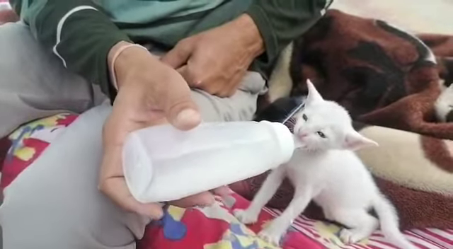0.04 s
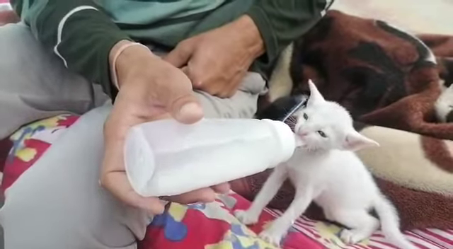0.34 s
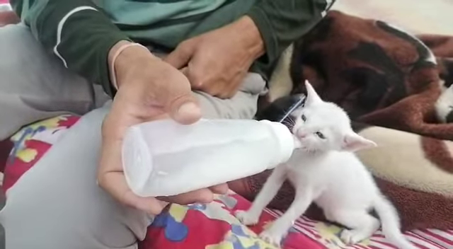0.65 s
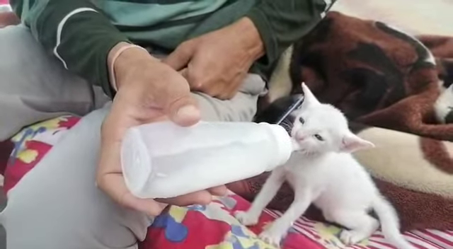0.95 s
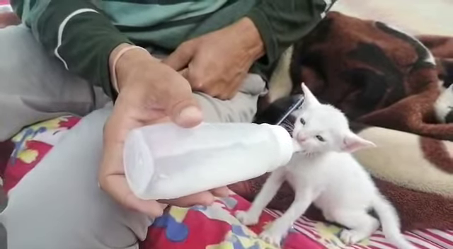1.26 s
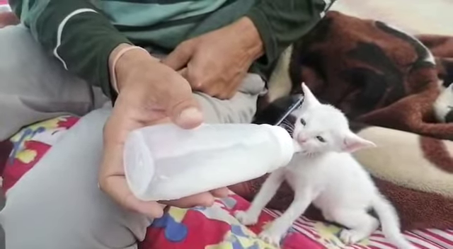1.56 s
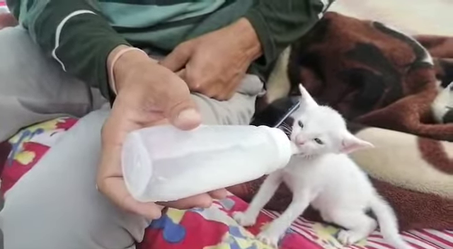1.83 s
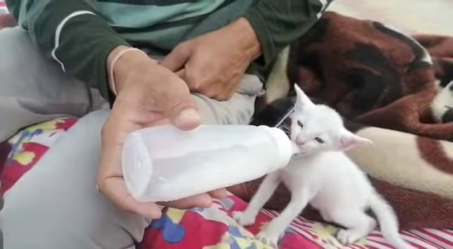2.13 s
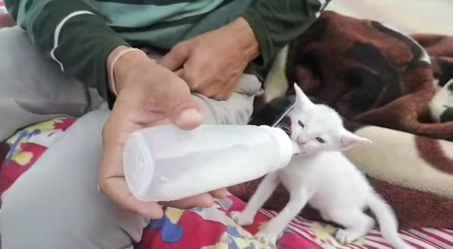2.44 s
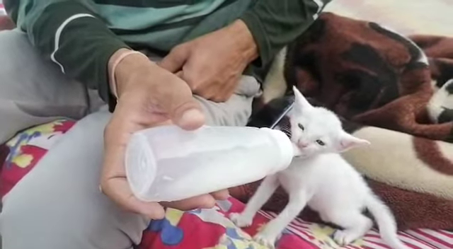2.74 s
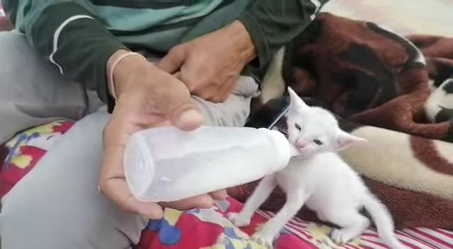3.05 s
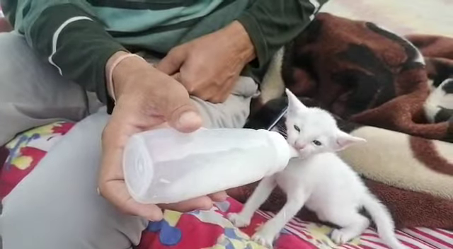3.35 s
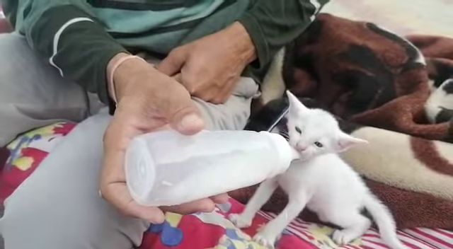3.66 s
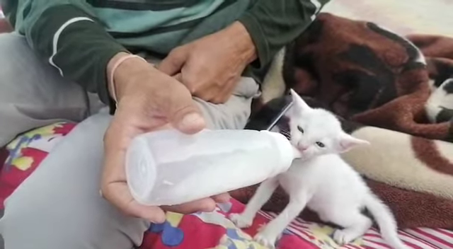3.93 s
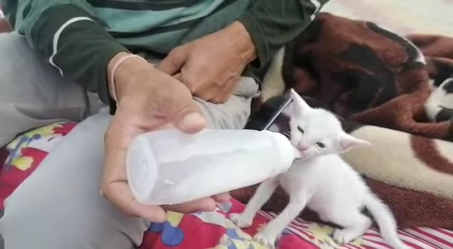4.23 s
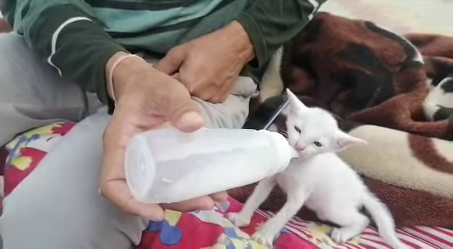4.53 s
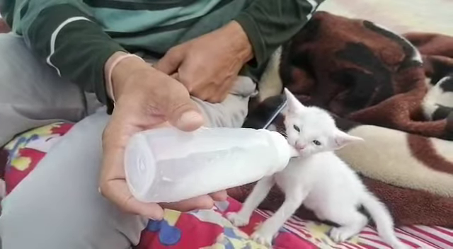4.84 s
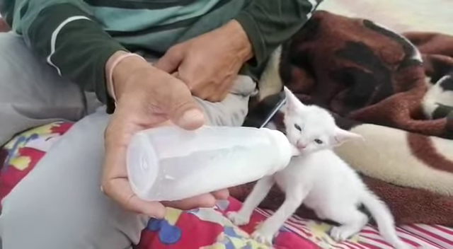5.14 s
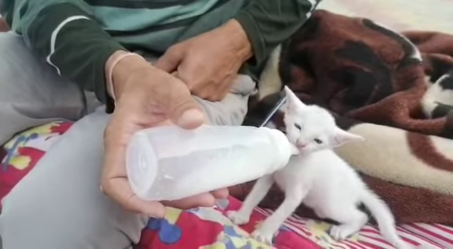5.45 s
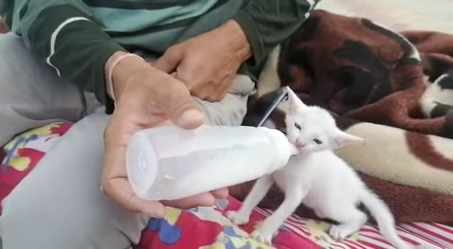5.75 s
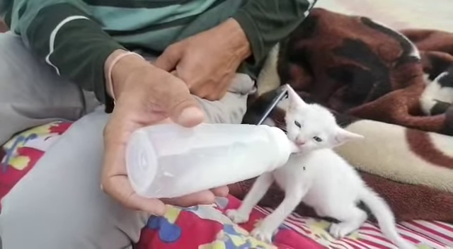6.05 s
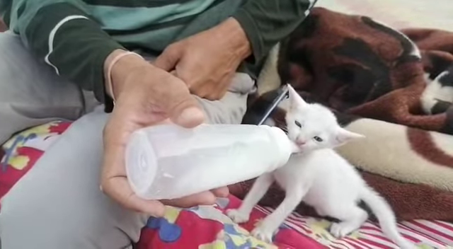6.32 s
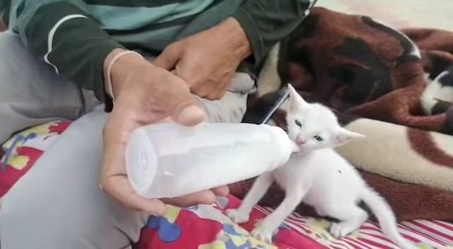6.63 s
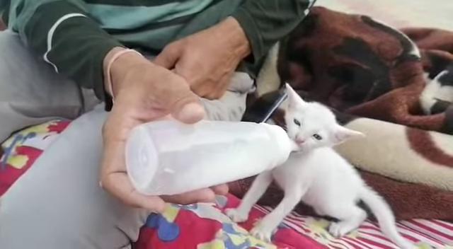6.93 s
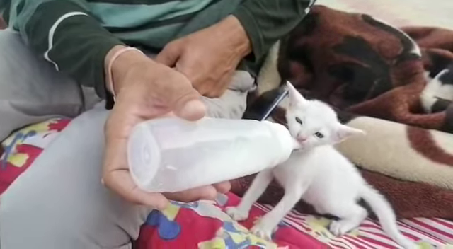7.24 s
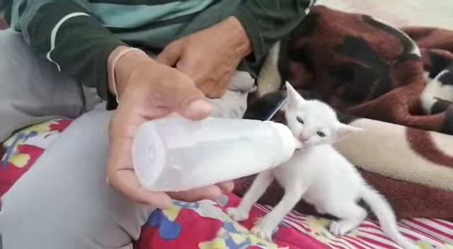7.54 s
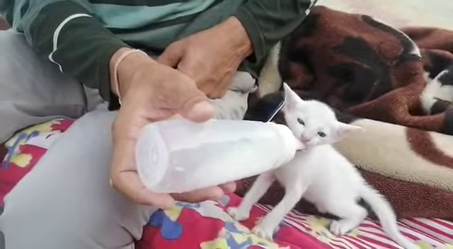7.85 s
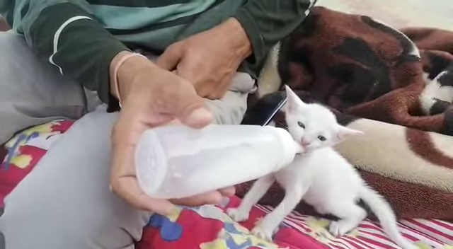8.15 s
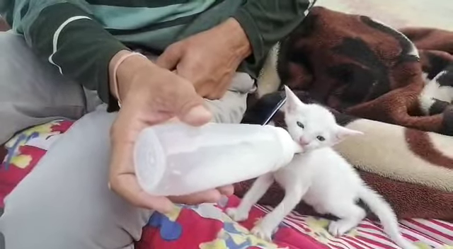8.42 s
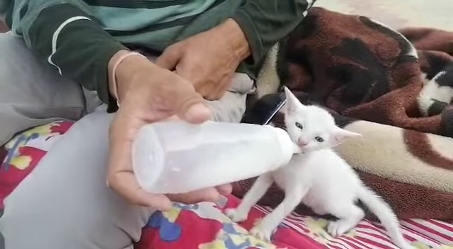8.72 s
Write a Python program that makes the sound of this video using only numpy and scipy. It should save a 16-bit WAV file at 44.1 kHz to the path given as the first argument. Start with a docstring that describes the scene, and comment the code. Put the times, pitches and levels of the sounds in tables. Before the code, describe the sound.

High-pitched kitten mews rise and fall, often overlapping, while faint wet suckling and tiny squeaks come from a bottle close by.

```python
"""Hungry kittens mew on a blanket in a small quiet room while one is fed from a bottle.
A snuffle opens over low room rumble, then two mews overlap: each scoops up to a crest, holds, sags and
drops as the mouth closes; its second harmonic flares briefly near the crest. More follow, among
smacks, thin squeaks and wet sucking at the teat, which is loudest near 4 s. After 7 s the voices rest,
leaving snuffles, smacks and a squeak; a last pair of mews comes near 8 s, and a faint suck ends it."""
import sys
import numpy as np
from scipy import signal
from scipy.fft import rfft, irfft
from scipy.io import wavfile
from scipy.ndimage import uniform_filter1d

SR = 44100
rng = np.random.default_rng(int(sys.argv[2]) if len(sys.argv) > 2 else 0)


def generate_wav(signal):
    """Clip the signal to [-1, 1] and save it as 16-bit WAV at the path in sys.argv[1]."""
    frames = np.transpose(np.atleast_2d(signal))
    scaled = np.clip(frames, -1, 1) * 32767
    pcm = np.round(scaled).astype(np.int16)
    wavfile.write(sys.argv[1], SR, pcm)


N = 387360
TIME = np.arange(N) / SR
CUTOFF_HZ = 15700


def from_db(db):
    """Decibels to gain."""
    return 10 ** (np.asarray(db) / 20)


def unit_rms(x):
    """Scale to rms 1."""
    return x / np.sqrt(np.mean(x ** 2) + 1e-20)


def at_hz(curve, hz):
    """Read a curve on a log-frequency axis."""
    curve = np.array(curve)
    return np.interp(np.log(np.maximum(hz, 1)), np.log(curve[:, 0]), curve[:, 1])


def pan(db):
    """Constant-power stereo gains; positive dB leans left."""
    gains = from_db(np.array([[.5], [-.5]]) * db)
    return gains / np.sqrt(np.mean(gains ** 2, axis=0))


def drift(size, rate_hz):
    """Random modulator of rms 1, rolled off above the rate."""
    hz = np.fft.rfftfreq(size, 1 / SR)
    return unit_rms(irfft(rfft(rng.standard_normal(size)) / (1 + (hz / rate_hz) ** 2), size))


def ramp(x, begin, end):
    """Rise evenly from 0 at begin to 1 at end, then hold."""
    return np.clip((x - begin) / max(end - begin, 1 / SR), 0, 1)


def add(out, start_s, sound):
    """Mix a sound in at its cue."""
    i = max(int(start_s * SR), 0)
    out[:, i:i + sound.shape[-1]] += sound[..., :N - i]


# Stereo image of the noise, centred bass and wide treble: f/Hz, left-right correlation
CORRELATION = [(50, 0.97), (250, 0.8), (600, 0.58), (1200, 0.17), (4000, 0.015), (15000, 0.018)]
def noise(colour, size=N, tilt_db=0):
    """Stereo noise of rms 1, shaped by an EQ curve and a tilt per octave."""
    hz = np.fft.rfftfreq(size, 1 / SR)
    mid, side = rfft(rng.standard_normal((2, size)))
    alike = at_hz(CORRELATION, hz)
    stereo = np.sqrt(1 + alike) * mid + np.sqrt(1 - alike) * side * [[1], [-1]]
    skirts = 1 / np.sqrt((1 + (colour[0][0] / (hz + 1)) ** 8) * (1 + (hz / colour[-1][0]) ** 8))
    eq = from_db(at_hz(colour, hz) + tilt_db * np.log2(hz + 1))
    return unit_rms(irfft(stereo * skirts * eq, size))


def bursts(cues, colour, flutter_db, flutter_hz, depth_db):
    """Fluttering noise bursts that swell and die away, each with its own brightness."""
    out, t = np.zeros((2, N)), TIME[:SR // 2]
    for start, peak, end, db, tilt_db in cues:
        level = np.interp(start + t, [start, peak, end], [db - depth_db, db, db - depth_db],
                          right=-np.inf)
        flutter = unit_rms(from_db(flutter_db * drift(len(t), flutter_hz)))
        add(out, start, from_db(level) * flutter * noise(colour, len(t), tilt_db))
    return out


# EQ of the room's rumble and of its air: f/Hz, relative level/dB
RUMBLE_EQ = [(12, -40), (20, -12.5), (81, 2.5), (120, -4.5), (145, -12.5), (199, -18), (230, -19.5),
             (300, -46), (510, -120)]
AIR_EQ = [(180, 10), (300, 7), (430, 3), (550, 11), (760, 1), (1100, 0), (1600, -3), (2100, -1), (3200, -7),
          (4500, -9), (7300, -12), (8500, -18), (15500, -18)]
# Fader ride of the rumble: t/s, level/dB
RUMBLE_RIDE = [(0, -52.5), (2.3, -56.5), (2.7, -52), (3.7, -52), (6.6, -55.5), (7.3, -51), (8.78, -53)]
def room_tone(air_db=-62.5):
    """The bed: a slowly shifting rumble under faint steady air."""
    ride = from_db(np.interp(TIME, *np.transpose(RUMBLE_RIDE)))
    return ride * noise(RUMBLE_EQ) + from_db(air_db) * noise(AIR_EQ)


def reverb(send, t60_s=0.34, predelay_s=0.011, wall_hz=6000):
    """Dense dull wall reflections, different at each microphone."""
    t = TIME[:SR * 3 // 4]
    tail = rng.standard_normal((2, len(t))) * from_db(-60 * t / t60_s) * (t > predelay_s)
    tail /= np.sqrt(np.sum(tail ** 2, axis=1, keepdims=True))
    tail = signal.sosfilt(signal.butter(1, wall_hz, fs=SR, output="sos"), tail)
    return signal.fftconvolve(send, tail, axes=1)[:, :N]


# Snuffle cues: start t/s, peak t/s, end t/s, level/dB, tilt/(dB per octave)
SNUFFLE_CUES = [(0, .04, 0.28, -60, -1), (.9, 1.0, 1.19, -61, -2), (6.1, 6.22, 6.46, -50.5, -1),
                (7.25, 7.38, 7.55, -54, -1), (7.74, 7.87, 8.1, -54, 0)]
# Their breathy EQ: f/Hz, relative level/dB
SNUFFLE_EQ = [(1700, -14.5), (2000, -1.5), (2500, -16), (2950, -9), (3200, 3.5), (3500, -10), (3900, 0),
              (4400, -13.5), (6000, -20)]
def snuffles():
    """Soft puffs of breath between the mews."""
    return bursts(SNUFFLE_CUES, SNUFFLE_EQ, flutter_db=2.5, flutter_hz=40, depth_db=17)


# Scuff cues: start t/s, peak t/s, end t/s, level/dB, tilt/(dB per octave)
SCUFF_CUES = [(.897, .915, 0.96, -36.5, -1), (.92, .96, 1.06, -45, 1), (4.915, 4.927, 4.96, -45.5, -2),
              (4.965, 4.978, 5.03, -49, 1.5)]
# Their muffled EQ: f/Hz, relative level/dB
SCUFF_EQ = [(190, -12.5), (270, 4.5), (350, 6.5), (440, -13.5), (550, -2), (800, -37), (1200, -47),
            (1650, -11), (2400, -44), (3200, -21), (4200, -32), (7000, -24.5), (10000, -50)]
def scuffs():
    """Short, dull, low scuffs with a fast grain."""
    return bursts(SCUFF_CUES, SCUFF_EQ, flutter_db=2, flutter_hz=150, depth_db=12)


# Suck cues: start t/s, peak t/s, end t/s, level/dB, tilt/(dB per octave)
SUCK_CUES = [(.68, .76, 1.05, -57, 14), (1.72, 1.79, 1.95, -45, 5.5), (1.80, 1.855, 2.01, -43.5, 1),
             (4.90, 5.04, 5.24, -44.5, -8), (3.907, 3.913, 4.0, -45, 1), (3.93, 3.947, 4.07, -39, 1),
             (3.96, 4.015, 4.26, -41, -1), (5.46, 5.57, 5.77, -49, 6), (8.08, 8.17, 8.4, -57, -1),
             (8.44, 8.54, 8.76, -54, -2.5)]
# Their peaky EQ: f/Hz, relative level/dB
SUCK_EQ = [(880, -68), (1500, -34.5), (1950, -10), (2420, -19.5), (3260, -3.5), (3480, -14.5), (4040, -9.5),
           (4650, -13), (6510, -13), (7700, -27.5), (9540, -30), (11200, -62.5), (14000, -61)]
def sucking():
    """Air hisses as it is sucked past the teat."""
    return bursts(SUCK_CUES, SUCK_EQ, flutter_db=1.5, flutter_hz=90, depth_db=21.5)


# Mouth smacks: t/s, relative level/dB, cavity f/Hz
SMACK_CUES = [(1.21, -47.5, 1686), (1.707, -41, 1154), (2.943, -39.5, 2110), (3.302, -36.5, 1480),
              (3.336, -46, 1170), (3.675, -35.5, 1630), (3.683, -43, 810), (4.102, -37, 1396),
              (4.541, -40.5, 1470), (4.851, -53, 1210), (7.133, -58, 1420), (7.468, -48, 1430),
              (7.518, -42, 1720)]
def smacks(decay_s=0.0067, sag=0.16, upper_ratio=1.9, upper_db=-5, ring_db=-5, spit_db=-9):
    """A wet click rings the mouth cavity, whose two resonances sink as it opens."""
    out, t = np.zeros((2, N)), TIME[:SR // 20]
    band = signal.butter(1, [700, 4200], "band", fs=SR, output="sos")
    decay = np.exp(-t / decay_s)
    for start, db, hz in SMACK_CUES:
        phase = 2 * np.pi * np.cumsum(hz * (1 + sag * (decay - .5))) / SR
        cavity = np.sin(phase) + from_db(upper_db) * np.sin(upper_ratio * phase)
        white = rng.standard_normal((2, len(t)))
        spit = unit_rms(signal.sosfilt(band, signal.sosfilt(band, white)))
        add(out, start, from_db(db) * decay * (from_db(ring_db) * cavity + from_db(spit_db) * spit))
    return out


# Wet squeaks: t/s, length/s, first f/Hz, last f/Hz, relative level/dB, pitch wobble/Hz
SQUEAK_CUES = [(1.127, .13, 4680, 2930, -49, 99), (1.368, 0.07, 3270, 4900, -49, 200),
               (1.76, 0.067, 3620, 3474, -44.5, 60), (1.79, .012, 5200, 5500, -44, 80),
               (1.853, 0.013, 5380, 5070, -39.5, 80), (1.868, 0.021, 5450, 4910, -41, 80),
               (2.508, .13, 4610, 2894, -50, 101), (3.784, 0.14, 4570, 2860, -48.5, 100),
               (3.949, 0.052, 3310, 3220, -28, 35), (3.944, 0.065, 6590, 6350, -35, 70),
               (3.986, 0.066, 2078, 1956, -41.5, 60), (4.0, 0.13, 4094, 3645, -40, 80),
               (4.835, 0.15, 4450, 2760, -50.5, 89.5), (5.991, 0.13, 4440, 2880, -51, 86),
               (7.554, 0.14, 4660, 2730, -45.5, 75)]
def squeaks(skew=0.83, shimmer=0.44):
    """Air whistling through a narrow wet gap: a gliding, unsteady tone."""
    out = np.zeros((2, N))
    stereo_phase = np.array([[0], [np.pi / 2]])
    for start, length, first_hz, last_hz, db, wobble_hz in SQUEAK_CUES:
        glide = np.linspace(0, 1, int(length * SR))
        hz = first_hz * (last_hz / first_hz) ** glide + wobble_hz * drift(len(glide), 350)
        phase = 2 * np.pi * np.cumsum(hz) / SR + stereo_phase
        swell = np.abs(np.sin(np.pi * glide ** skew)) * (1 + shimmer * drift(len(glide), 200))
        add(out, start, from_db(db) * swell * np.sin(phase))
    return out


CATCH_S, CATCH_ATTACK_S = .032, .012   # a mew ends on a short low catch in the voice
def mew_pitch(t, contour, waver=0.00401, waver_hz=25):
    """The wavering pitch scoops up, holds, sags, and steps down to the final catch."""
    start, crest, sag, closing, end, first_hz, crest_hz, sag_hz, drop_hz, bow = contour
    scoop = (crest_hz - first_hz) * np.sin(np.pi / 2 * ramp(t, start, crest))
    fall = sag_hz * ramp(t, sag, end) ** bow
    drop = drop_hz * np.sin(np.pi / 2 * ramp(t, closing, end - CATCH_S)) ** 2
    pitch = uniform_filter1d(first_hz + scoop - fall - drop, size=300)
    return pitch * (1 + waver * drift(len(t), waver_hz))


def mew_envelopes(t, contour, voice, flutter_db=2.26, flutter_hz=30):
    """Gains of harmonics 1 and 2, dB of the rest: bright at the crest, duller at the close."""
    start, crest, sag, closing, end = contour[:5]
    first_open, first_closed, second_open, second_closed, second_end = voice[:5]
    flare_peak, flare_s, flare_db, upper_open, upper_closed = voice[5:10]
    midway_db = (first_open + first_closed) / 2 - 2   # a slight dip halfway down the sag
    first_db = np.interp(t, [start, crest, (sag + closing) / 2, closing, end],
                         [first_open - 16, first_open, midway_db, first_closed, first_closed - 10])
    catch = end - CATCH_S
    second_db = np.interp(
        t, [start, crest, sag, closing, catch - CATCH_ATTACK_S, catch],
        [second_open - 21, second_open, second_open, second_closed, second_closed, second_end])
    upper_db = np.interp(t, [start, crest, sag, closing, end],
                         [upper_open - 22, upper_open, upper_open, upper_closed, upper_closed - 8])
    width_s = flare_s * np.where(t < flare_peak, .75, 1)   # the flare rises faster than it fades
    flare = from_db(flare_db) * np.exp(-.5 * ((t - flare_peak) / width_s) ** 2)
    flutter = from_db(flutter_db * drift(len(t), flutter_hz))
    return from_db(first_db), (from_db(second_db) + flare) * flutter, upper_db


# Formants of the throat: f/Hz, relative level/dB
THROAT_EQ = [(1300, 22.5), (2600, 5.5), (3500, -0.5), (4300, -4.5), (5300, 3), (6200, -17.5), (7000, -3.5),
             (8200, -25), (10000, -24), (12500, -21.5), (14000, -27), (16000, -33)]
def throat(orders, pitch, upper_db, voice, lobe_db=5, edge_db=5, edge_hold=0.75):
    """Overtone gains: the formants, rippled by lobes from the shape of each vocal pulse."""
    treble_db, lobe_spacing = voice[10:]
    order = orders[:, None]
    hz = order * pitch
    lobes = lobe_db * np.cos(2 * np.pi * order / lobe_spacing)
    shelf = treble_db * ramp(hz, 6000, 9000)
    # a thin edge near the ninth harmonic lingers while the middle overtones die away
    edge_band = np.exp(-.5 * ((order - 8.65) / 2.1) ** 2) * ramp(hz, 4000, 8000)
    edge = edge_band * (edge_db + edge_hold * (upper_db.max() - upper_db))
    gains = from_db(at_hz(THROAT_EQ, hz) + lobes + shelf + edge) * (hz < CUTOFF_HZ)
    return gains / np.sqrt(np.sum(gains[:4] ** 2, axis=0))


def mew(contour, voice, stereo, jitter=0.0035, shimmer=0.12, swell_db=5, rasp_db=-27, fade_s=.012):
    """One cry and its start time: a stack of harmonics on one trembling pitch."""
    start, crest, _, _, end = contour[:5]
    late_ms, first_pan, second_pan, upper_pan = stereo
    t = np.arange(start - fade_s / 2, end + fade_s / 2, 1 / SR)
    pitch = mew_pitch(t, contour)
    first, second, upper_db = mew_envelopes(t, contour, voice)
    phase = 2 * np.pi * np.cumsum(pitch * (1 + jitter * drift(len(t), 120))) / SR
    phase = phase - np.pi * pitch * late_ms / 1000 * np.array([[1], [-1]])
    out = first * pan(first_pan) * np.sin(phase) + second * pan(second_pan) * np.sin(2 * phase)
    roughness = from_db(rasp_db + 6.5 * (1 - ramp(t, start, crest)))   # rougher on the attack
    orders = np.arange(3, 17)
    for k, gain in zip(orders, throat(orders, pitch, upper_db, voice)):
        # each overtone swells by itself, faster on the left than on the right
        swell = from_db(swell_db * np.array([drift(len(t), 23), drift(len(t), 5.9)]))
        rasp = 1 + roughness * k * drift(len(t), 230)
        out += from_db(upper_db) * gain * swell * rasp * pan(upper_pan) * np.sin(k * phase)
    fade = np.clip(np.minimum(t - t[0], t[-1] - t) / fade_s, 0, 1)
    return t[0], out * fade * (1 + shimmer * drift(len(t), 75))


# Pitch contour of each mew: start t/s, crest t/s, sag t/s, closing t/s, end t/s, first f/Hz,
# crest f/Hz, sag depth/Hz, closing drop/Hz, bow of the sag (1 = straight, less = falls early)
MEW_CONTOURS = [(.26, .40, .43, 0.71, 0.83, 880, 1406, 573, 70, 0.99),
                (.39, .545, 0.55, 0.94, 1.11, 690, 1295, 631, 110.4, 1.005),
                (1.415, 1.539, 1.584, 1.925, 2.08, 738, 1267, 505.5, 70, 0.85),
                (2.018, 2.135, 2.154, 2.474, 2.62, 752, 1500, 491, 419, .37),
                (2.78, 2.906, 2.95, 3.26, 3.38, 687, 1313, 534.5, 250.3, 1.04),
                (3.18, 3.295, 3.394, 3.61, 3.829, 517, 1180, 546, 170, .96),
                (4.061, 4.191, 4.2, 4.61, 4.688, 804, 1373, 501.6, 286, 1.15),
                (4.913, 5.078, 5.11, 5.61, 5.769, 421, 1075, 579.3, 44.2, 0.64),
                (5.352, 5.516, 5.538, 5.8, 5.991, 819, 1351, 495, 215, .54),
                (6.26, 6.441, 6.485, 6.7, 6.899, 480, 1169, 609, 50, .85),
                (6.579, 6.73, 6.795, 7.03, 7.172, 772, 1379, 480, 301, .72),
                (7.852, 7.969, 8.06, 8.4, 8.585, 859, 1396, 600, 215, .65),
                (7.89, 8.025, 8.1, 8.26, 8.37, 526, 1199, 560, 69.7, 1.25)]
# Its timbre, in relative levels: fundamental level/dB at crest, closing; second harmonic level/dB at
# crest, closing, end; flare peak t/s, flare width/s, flare level/dB; overtone level/dB at crest,
# closing; treble shelf/dB; lobe spacing/harmonics
MEW_VOICES = [(-40, -41.5, -40, -52, -61, 0.428, .016, -36, -49, -72, -12, 3.8),
              (-44, -41.5, -40, -58, -42, 0.556, .021, -28, -46, -70, 4, 4.3),
              (-55.5, -38.5, -43.5, -73, -63, 1.6006, 0.038, -24, -51, -77, -3, 5),
              (-38, -39, -38, -56.5, -49, 2.152, 0.027, -29.5, -35.5, -60, -4.5, 4.02),
              (-46.5, -42, -48, -60.5, -42.5, 2.976, .012, -25.5, -52, -80, 2, 5.2),
              (-51, -43.5, -36.5, -54, -46.5, 3.365, 0.018, -31.5, -59, -83, -11, 3.5),
              (-46.5, -37.5, -36.5, -62.5, -48.5, 4.211, 0.016, -27.5, -55.5, -82, 2.5, 3),
              (-52, -56, -43.5, -50, -44.5, 5.15, 0.03, -30.5, -53.5, -78, -9, 4.9),
              (-46, -43, -38, -58.5, -57.5, 5.53, 0.026, -35.5, -51, -82, 1.5, 2.5),
              (-48.5, -52, -42.5, -50.5, -48, 6.459, .025, -28, -49, -70, -14, 4.3),
              (-49.5, -41.5, -44.5, -56, -40.5, 6.816, 0.048, -33, -45, -77, -13.5, 2.95),
              (-42.5, -38.5, -39.5, -63, -42, 8.05, .022, -19.5, -41.5, -80, -8.5, 3),
              (-48, -53.5, -37.5, -50, -47.5, 8.095, 0.017, -27, -46, -75, -14, 3.5)]
# Its stereo image: left delay/ms; pan/dB of fundamental, second harmonic, overtones
MEW_STEREO = [(0.14, 1.0, 7, 0), (-0.302, -1, 5, -1.5), (0.076, 4, 14.5, -2), (-0.352, 2.5, 8, -1),
              (0.076, 5, 9, -0.5), (-0.29, -2.5, 3.5, 0.5), (0.16, 1, 13.5, 1), (-0.11, -2.0, 2, 2.5),
              (0.14, 5.5, 7.0, 0), (-0.076, -2.5, -6.5, 2.5), (0.13, 3.5, 3.5, -0.5), (0.07, 1, 6.0, -4),
              (0.076, 0, 4.0, 1)]
def kittens():
    """The lead voices: kittens mewing over one another."""
    out = np.zeros((2, N))
    for contour, voice, stereo in zip(MEW_CONTOURS, MEW_VOICES, MEW_STEREO):
        add(out, *mew(contour, voice, stereo))
    return out


def scene():
    """Mews and feeding sounds up close, a little reverb, room tone underneath."""
    foley = sucking() + scuffs() + snuffles()
    whistles = squeaks()
    near = foley + from_db(0.3) * kittens() + from_db(-0.5) * whistles + smacks()
    bed = room_tone()
    send = near + from_db(1) * whistles   # extra reverb on the squeaks
    return near + from_db(-12) * reverb(send) + bed


# Left-right balance of the two microphone ports: f/Hz, pan/dB
PORT_BALANCE = [(100, -1.5), (600, 0.5), (1200, -4.5), (2300, -0.5), (5300, 3.5), (6500, -10.5),
                (8000, -9.5), (9800, -7), (11500, -1)]
def record(dry):
    """The microphone ports colour the sides differently; a steep low-pass cuts the top."""
    hz = np.fft.rfftfreq(N, 1 / SR)
    coloured = irfft(rfft(dry) * pan(at_hz(PORT_BALANCE, hz)), N)
    return signal.sosfilt(signal.ellip(12, .1, 80, CUTOFF_HZ, fs=SR, output="sos"), coloured)


dry = scene()
out = record(dry)
generate_wav(out)
```